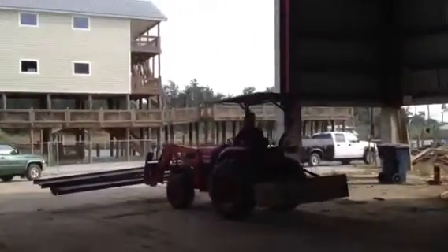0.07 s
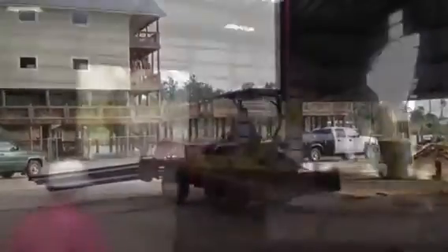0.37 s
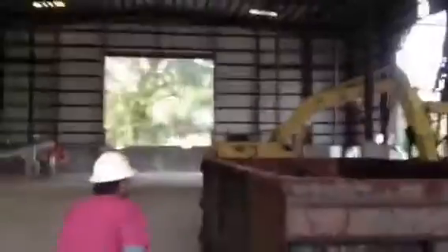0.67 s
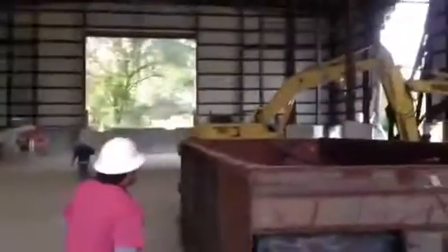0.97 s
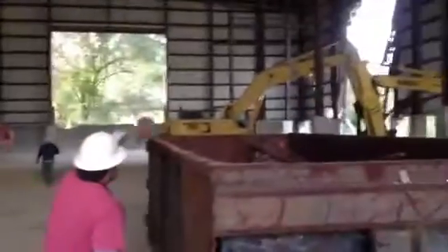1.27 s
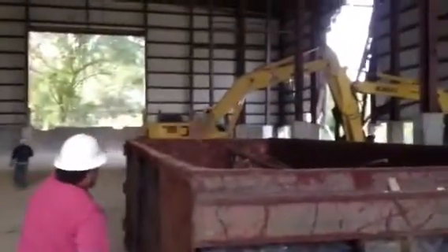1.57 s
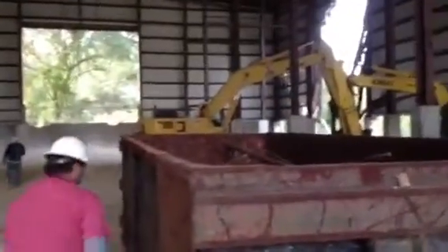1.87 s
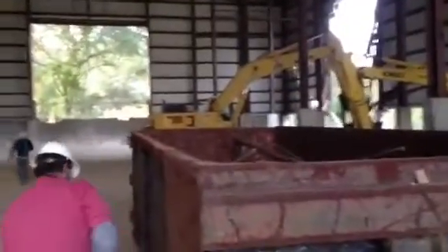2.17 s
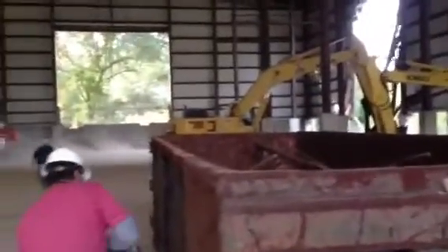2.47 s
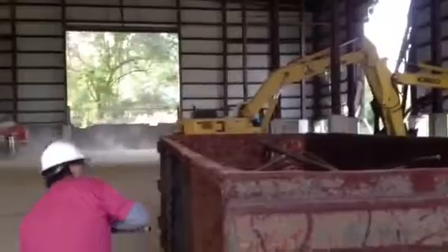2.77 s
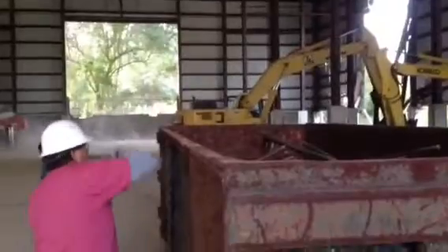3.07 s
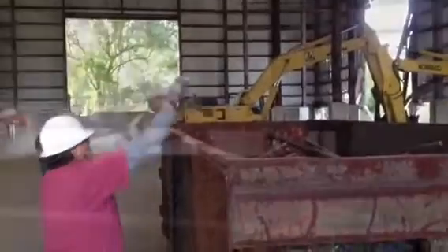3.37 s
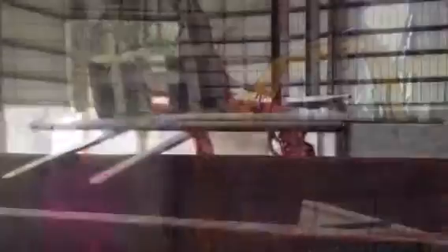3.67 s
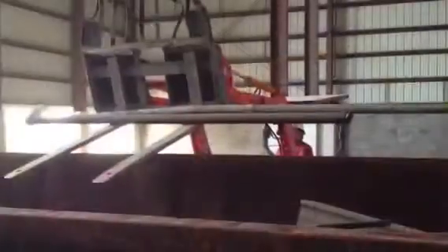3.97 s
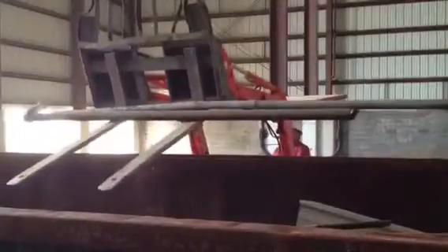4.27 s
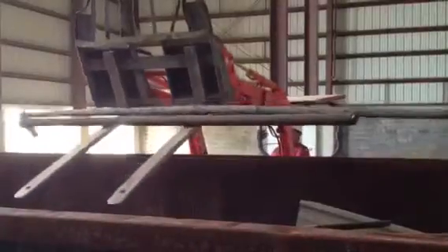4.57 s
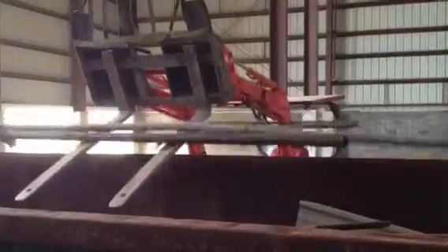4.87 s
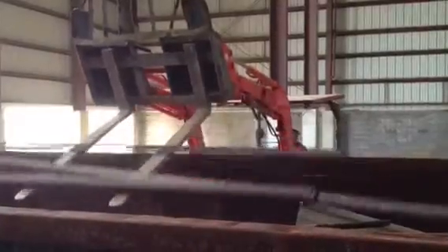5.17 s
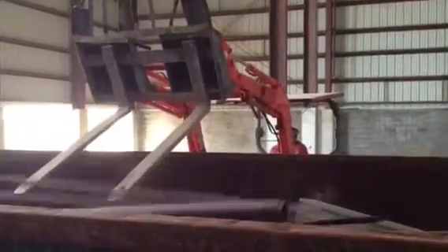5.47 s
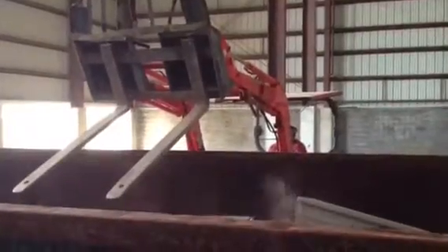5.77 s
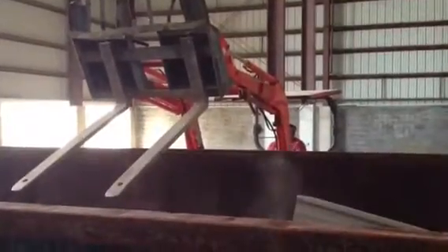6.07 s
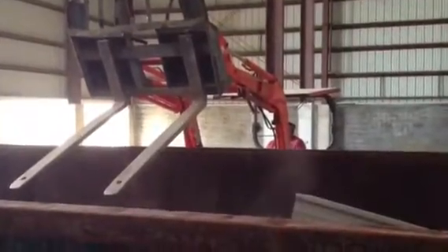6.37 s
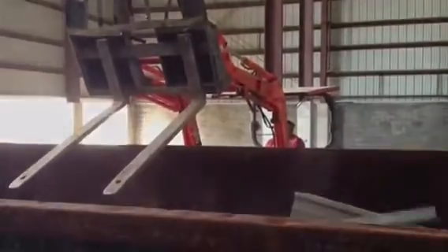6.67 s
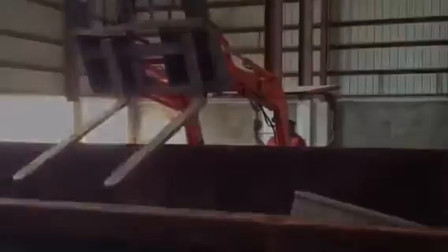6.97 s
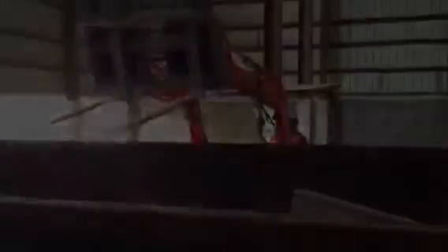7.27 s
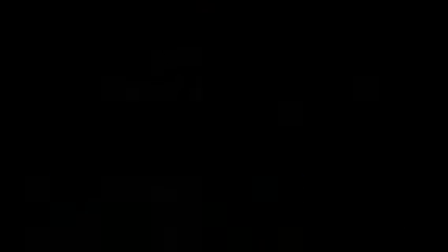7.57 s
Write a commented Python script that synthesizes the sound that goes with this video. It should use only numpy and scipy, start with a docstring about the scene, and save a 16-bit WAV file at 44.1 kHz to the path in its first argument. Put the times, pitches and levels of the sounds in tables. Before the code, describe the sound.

Diesel engines rumble as scrap metal booms, pipes slide and clang into a dumpster, and a sheet-metal panel topples in an echoing shed.

```python
"""Long metal pipes slide off a tractor's forks, hit a dumpster's rim, clatter to the bottom and ring.
The sound opens on the diesel tractor in a yard, then moves into a big steel shed, where a load of scrap
crashes and booms. The pipes follow, scraping by stick-slip, and a sheet-metal panel topples after them.
Each blow is a contact plus dying chatter that rings the steel and feeds the shed's reverberation.
Rubble, grit, engines and distant site noise lie underneath."""
import sys
import numpy as np
from scipy import signal
from scipy.fft import rfft, irfft
from scipy.io import wavfile
from scipy.ndimage import uniform_filter1d, minimum_filter1d, map_coordinates

SR = 44100
rng = np.random.default_rng(int(sys.argv[2]) if len(sys.argv) > 2 else 0)


def output_pcm(signal):
    """Save a mono or channel-first signal as 16-bit PCM at the path in sys.argv[1].

    Samples are clipped to [-1, 1] before scaling.
    """
    pcm = np.clip(np.atleast_2d(signal).T, -1, 1) * 32767
    wavfile.write(sys.argv[1], SR, np.round(pcm).astype(np.int16))


N = 344421
T = np.arange(N) / SR


def pipes():
    """Long pipes hit the rim, then bounce on the bottom: walls clang, pipes ring on, low modes longest."""
    # Blows on rim and bottom. Each row: start in seconds, level in dB, hardness in dB.
    rim_blows = [(4.864, -10.5, 9), (4.92, -17, -7.5), (4.995, -11, 0.5), (5.095, -11.5, -1),
                 (5.16, -13, 3)]
    bottom_blows = [(5.236, -8, 1), (5.324, -2.5, 0.5), (5.358, -9, 2.5), (5.425, -9, 0),
                    (5.478, -15, -10.5), (5.562, -11, -1), (5.612, -6, 1.5), (5.655, -7, 6.5),
                    (5.732, -8.5, 9), (5.8, -9, -3), (5.95, -11.5, -0.5), (6.066, -15.5, -3.5),
                    (6.13, -15.5, -2.5), (6.247, -27, -10.5)]
    # Spectra of those blows. Each row: frequency in Hz, gain in dB.
    rim_spectrum = [(53, -66), (90, -50.5), (194, -37.5), (262, 3), (420, -18.5), (510, 0.5), (749, -1.5),
                    (1280, 1), (1880, -3), (2760, -17), (3080, -12), (4330, -5), (6510, -30), (9570, -28.5),
                    (15000, -41.5)]
    bottom_spectrum = [(40, -45.5), (110, -32.5), (185, -10), (370, -10.5), (429, -12), (521, -6.5),
                       (567, -9.5), (1200, -6.5), (1490, -0.5), (1900, -5.5), (2760, -13), (4060, -11),
                       (4820, -11), (5300, -18), (6510, -24), (10600, -31), (15000, -42)]
    # Pipe modes. Each row: frequency in Hz, energy in dB.
    pipe_modes = [(1281, -35), (1381, -36), (1443, -32), (1490, -34), (1593, -37), (1715, -38), (1906, -39),
                  (2137, -32), (2385, -37), (2638, -37), (2902, -41), (3150, -32), (3410, -34), (3477, -30),
                  (3704, -30), (3771, -34), (3968, -26.5), (4080, -30), (4188, -32), (4385, -29.5),
                  (4517, -34), (4732, -26.5)]
    rim = blows(rim_blows, chatter_s=0.071, drag=0.49, contacts_per_s=3000, snap=3,
                low_t60_s=0.35, high_t60_s=0.058, ring_db=-1)
    rolling = settling(start_s=6, knocks_per_s=15, first_db=-18.5, fade_db_per_s=1.5,
                       hardness_db=-10, count=10)
    bottom = blows([*bottom_blows, *rolling], chatter_s=0.047, drag=0.099, contacts_per_s=1900, snap=4.4,
                   low_t60_s=0.25, high_t60_s=0.023, ring_db=2.5)
    walls = undb(2.5) * through(rim, colour(rim_spectrum))
    walls += undb(1.5) * through(bottom, colour(bottom_spectrum))
    # Nearly equal lengths ring in beating clusters.
    clusters = [(hz / length, db, 1.5 * (hz / 2000) ** -.6)
                for hz, db in pipe_modes for length in (.998, 1, 1.002)]
    shimmer = ring(overtones(low_hz=5280, high_hz=14000, t60_s=0.39, top_db=-3, count=90), size=14000)
    shaking = bottom + undb(-12) * rim
    return walls + undb(-6.5) * through(shaking, ring(clusters)) + undb(-22.5) * through(shaking, shimmer)


def wall_clangs():
    """Square hits ring the dumpster's wall."""
    # Each row: start in seconds, level in dB, pitch ratio.
    hits = [(4.866, -20, 0.72), (5.0, -14.5, 0.98), (5.362, -26, 0.89), (5.44, -24, 0.79),
            (5.481, -23.5, 1.14), (5.953, -20, 1.16), (6.006, -26, 1.16), (6.1, -26, 1.02),
            (6.131, -24.5, 1.17), (6.735, -24, 0.92), (6.83, -22.5, 0.9), (6.915, -22.5, 0.96)]
    # Each row: frequency in Hz at ratio 1, energy in dB, t60 in seconds.
    wall_modes = [(508, -10, .25), (910, -3, .25), (1139, -13.5, .22), (1268, 1, .15), (1305, -1, .24),
                  (1887, -8, .2)]
    return clangs(hits, wall_modes)


def end_clangs():
    """Pipes struck on their ends ring brightly."""
    # Each row: start in seconds, level in dB, pitch ratio.
    hits = [(5.185, -24.5, 1.02), (5.326, -13.5, 1.1), (5.368, -20, 1.06), (5.445, -22.5, 1.13),
            (5.674, -17, 1), (5.712, -21.5, 1.12), (5.772, -25, 0.95), (5.803, -19.5, 1.05),
            (5.953, -21.5, 1.06)]
    # Each row: frequency in Hz at ratio 1, energy in dB, t60 in seconds.
    end_modes = [(3050, -3.5, .2), (3750, 3, .2), (3960, 1, .22), (4170, -4, .16), (4390, -8, .2),
                 (4550, -1.5, .2)]
    return clangs(hits, end_modes)


def tines():
    """The fork tines ring as the pipes drop off; the last pipe judders over a tip and makes it sing."""
    # Each row: start in seconds, level in dB.
    tine_strikes = [(4.867, -21.5)]
    # Each row: frequency in Hz, energy in dB, t60 in seconds.
    tine_modes = [(758, 4.5, .12), (1330, -13, .3), (1710, 1, .4), (3138, -4.5, 0.84), (3320, -3.5, .3),
                  (4260, -6.5, .8), (4650, -8.5, .13), (4900, 4.5, 0.13), (7140, -3.5, 0.054)]
    # Spells of singing. Each row: start in seconds, level in dB, hold in seconds.
    sings = [(4.7, -38.5, .13), (4.878, -20, .15)]
    sing_hz, judder_hz = 3138, 24
    phase = 2 * np.pi * np.cumsum(sing_hz * (1 + .004 * walk(120) + .018 * walk(900))) / SR
    judders = np.cumsum(judder_hz * (1 + .2 * walk(30))) / SR
    pulsing = undb(2.9 * np.cos(2 * np.pi * judders) + 3.8 * walk(260))
    pressure = sum(undb(db) * swell(s, attack_s=.012, hold_s=hold_s, release_s=.02)
                   for s, db, hold_s in sings)
    rasp = undb(-9.5) * resonate(contacts(900), [(3310, 240, 0)])
    ringing = signal.oaconvolve(strike(tine_strikes), ring(tine_modes))[:N]
    return low_cut(ringing, hz=300) + (np.sin(phase) + rasp) * pressure * pulsing


def slide():
    """Stick-slip on the forks: the pipes creep, slip in bright scrapes, then judder in short jerks."""
    # Sliding resonances. Each row: centre in Hz, width in Hz, gain in dB.
    scrape_bands = [(1430, 160, -1.5), (1820, 350, -1.5), (3540, 330, -8), (4500, 740, -4.5),
                    (4830, 280, -1), (7200, 2800, -26.5), (11000, 7000, -22)]
    judder_bands = [(290, 96, -7.5), (514, 150, -5), (880, 230, -2), (1080, 120, 0), (1350, 200, -2),
                    (1730, 450, -8.5)]
    # Each row: start in seconds, level in dB.
    slip_events = [(4.385, -24.5), (4.418, -27), (4.448, -29.5), (4.51, -40.5), (4.545, -34)]
    jerk_events = [(4.555, -26), (4.608, -20.5), (4.75, -23), (4.795, -30)]
    sag_start_s, sag_length_s, sag_per_s = 4.53, .11, 0.99
    scrape = resonate(contacts(3500), scrape_bands) * undb(1.2 * walk(68))
    # The pitch sinks as the pipes move down the tines.
    pitch_ratio = 1 - sag_per_s * np.clip(T - sag_start_s, 0, sag_length_s)
    scrape = map_coordinates(scrape, [np.cumsum(pitch_ratio)], mode="mirror")
    judder = resonate(contacts(1300), judder_bands) * undb(1.6 * walk(35))
    creep = undb(-29) * swell(start_s=4.223, attack_s=0.27, hold_s=0.094, release_s=.2)
    slips = sum(undb(db) * swell(s, attack_s=.008, hold_s=.0066, release_s=.013) for s, db in slip_events)
    jerks = sum(undb(db) * swell(s, attack_s=.02, hold_s=.02, release_s=.059) for s, db in jerk_events)
    return (creep + slips) * scrape + jerks * judder


def squeak():
    """A slipping pipe catches on a tine and squeaks with a rough, falling pitch."""
    start_s, length_s = 4.405, 0.087
    start_hz, sag_hz_per_s = 1960, 4300
    hz = start_hz - sag_hz_per_s * np.clip(T - start_s, 0, length_s)
    phase = 2 * np.pi * np.cumsum(hz * (1 + 0.065 * walk(900))) / SR
    envelope = swell(start_s, attack_s=.012, hold_s=length_s, release_s=.005) * undb(-28 + 5 * walk(300))
    return (np.sin(phase) + undb(-23) * np.sin(2 * phase)) * envelope


def scrap():
    """A heavy load of mixed scrap lands across the shed and settles."""
    # Each row: start in seconds, level in dB, hardness in dB.
    landing = [(1.893, -17, 6), (1.906, -8.5, -1), (1.924, -8.5, 8), (1.98, -7.5, 1.5), (2.012, -14, 0),
               (2.09, -15, -5), (2.22, -14.5, -7), (2.31, -18.5, -5), (2.39, -24, -13.5)]
    # Each row: frequency in Hz, gain in dB.
    spectrum = [(41, -67), (70, -33), (120, -16), (180, -4.5), (270, -4), (370, -4.5), (494, -2.5),
                (791, -1.5), (1080, -3.5), (1450, -2), (2850, -7), (3260, -10.5), (4170, -7.5), (4950, -13),
                (5450, -19.5), (9150, -28), (15000, -46)]
    rocking = settling(start_s=2.28, knocks_per_s=16, first_db=-28.5, fade_db_per_s=20.5,
                       hardness_db=-8, count=4)
    crash = blows([*landing, *rocking], chatter_s=0.052, drag=0.62, contacts_per_s=4000, snap=1.8,
                  low_t60_s=0.15, high_t60_s=0.08, ring_db=-9)
    return through(crash, colour(spectrum))


def floor_boom():
    """The heaviest scrap rings the steel floor."""
    # Each row: start in seconds, level in dB.
    floor_strikes = [(1.893, -27), (1.909, -22), (1.925, -22), (1.961, -24), (2.228, -26.5), (2.275, -31.5),
                     (2.325, -24.5), (2.402, -24.5), (2.49, -30)]
    # Each row: frequency in Hz, energy in dB, t60 in seconds.
    floor_modes = [(148.5, -7, 0.29), (195, 1.5, 0.16), (251, -0.5, 0.14), (324.5, -2, 0.14),
                   (374.4, -3.5, .16), (481, 0.5, 0.12)]
    ringing = signal.oaconvolve(strike(floor_strikes), ring(floor_modes, size=14000))[:N]
    return low_cut(ringing, hz=125)


def panel():
    """A sheet-metal panel topples, booms against the dumpster and rocks to rest."""
    # Each row: start in seconds, level in dB, hardness in dB.
    landing = [(6.733, -8.5, 0), (6.762, -12.5, -3), (6.827, -12, -5), (6.903, -13.5, -5)]
    # Each row: frequency in Hz, gain in dB.
    spectrum = [(41, -71), (70, -34), (125, -8), (180, 2), (269, -2), (420, -1.5), (780, -1), (960, 1.5),
                (1330, -2), (1850, -1.5), (2150, -6), (2650, -13), (3990, -10), (6530, -26.5), (9790, -32),
                (15000, -40)]
    rocking = settling(start_s=6.93, knocks_per_s=16, first_db=-19.5, fade_db_per_s=22,
                       hardness_db=-11.5, count=7)
    crash = blows([*landing, *rocking], chatter_s=0.037, drag=0.116, contacts_per_s=1800, snap=2.4,
                  low_t60_s=0.57, high_t60_s=0.077, ring_db=-4.5)
    return through(crash, colour(spectrum))


def panel_edge():
    """The panel's edge catches the near wall with a short, bright clank."""
    # Each row: start in seconds, level in dB, hardness in dB.
    edge_blows = [(6.824, -10.5, 0.92)]
    # Each row: frequency in Hz, gain in dB.
    spectrum = [(200, -32), (1000, 5), (2600, -14), (3300, 1.5), (4000, 1.5), (4800, -2), (5600, -21),
                (8500, -25), (9300, -11.5), (10300, -12.5), (12000, -25), (15000, -35)]
    clank = blows(edge_blows, chatter_s=0.035, drag=0, contacts_per_s=2500, snap=3,
                  low_t60_s=0.16, high_t60_s=0.074, ring_db=6)
    return through(clank, colour(spectrum))


def rubble():
    """Loose rubble clinks and scuffs."""
    # Each row: start in seconds, level in dB, hardness in dB.
    knocks = [(.794, -31.5, 11), (.83, -31, 8.7), (.86, -34, 1), (1.463, -41, 17.5), (1.52, -38, 7),
              (3.803, -27.5, 1), (3.832, -32.5, 1)]
    # Each row: frequency in Hz, gain in dB.
    spectrum = [(50, -37), (130, -14), (300, 9), (470, 6.5), (700, 4), (1050, 3.5), (1500, -0.5),
                (4000, -9.5), (7000, -23), (15000, -28)]
    clinks = blows(knocks, chatter_s=0.038, drag=0, contacts_per_s=2100, snap=3.3,
                   low_t60_s=0.081, high_t60_s=.04, ring_db=9)
    return through(clinks, colour(spectrum))


def grit_and_hiss():
    """Short spills of grit, and the high hiss of the pipes scraping along the forks."""
    # Each row: start in seconds, level in dB, length in seconds.
    bursts = [(1.49, -42.5, 0.084), (2.99, -48.5, 0.23), (3.726, -38.5, 0.027), (4.25, -41, 0.24),
              (4.435, -33.5, 0.1), (4.495, -36, 0.18), (4.695, -31.5, 0.028), (4.723, -39.5, 0.28),
              (5.564, -29, 0.089), (6.349, -27.5, 0.058), (6.424, -35, 0.076), (6.537, -27.5, 0.06),
              (6.94, -36.5, 0.16), (7.216, -40.5, 0.05)]
    # Each row: frequency in Hz, gain in dB.
    spectrum = [(1500, -22), (4000, -2), (7500, -5.5), (11000, -4.5), (15000, -13.5)]
    envelope = 0
    for start_s, db, length_s in bursts:
        progress = np.maximum(T - start_s, 0) / length_s
        envelope += undb(db) * np.minimum(progress * 4, 1) * np.exp(-progress ** 2)
    return envelope * through(contacts(3000), colour(spectrum))


def board():
    """Something hollow, like a loose board, knocks a few times."""
    # Each row: start in seconds, level in dB.
    knocks = [(1.334, -45), (1.366, -47), (1.399, -47), (1.478, -44), (1.542, -47)]
    # Each row: frequency in Hz, energy in dB, t60 in seconds.
    board_modes = [(294, -4, .09), (380, -6, .08), (502, -6, .08), (605, -5.5, 0.05), (880, -7.5, .06),
                   (1040, -9, .05), (1720, -14.5, .03)]
    return signal.oaconvolve(strike(knocks), ring(board_modes, size=7000))[:N]


def tick():
    """A double contact close by: one dry tick with a low thump."""
    # Each row: start in seconds, level in dB.
    touches = [(3.856, -3), (3.8572, -1.5)]
    # Each row: frequency in Hz, gain in dB.
    spectrum = [(30, 0), (150, -7), (500, -3), (1100, 3), (1800, -4), (2800, 2), (4000, -12), (5600, -4),
                (6800, -19), (15000, -20)]
    return through(strike(touches), colour(spectrum))


def shed_tractor():
    """The tractor's diesel and loose parts, swelling as it tips the pipes."""
    # Each row: frequency in Hz, gain in dB.
    spectrum = [(29, -37), (50, -40.5), (128, -1.5), (186, -6), (272, -4), (307, -9.5), (362, -0.5),
                (449, -6), (544, -1), (2100, -8.5), (2480, -19.5), (4770, -21), (5910, -26.5),
                (9760, -29.5), (15000, -39.5)]
    # Each row: centre in Hz, width in Hz, gain in dB.
    loose_parts = [(4450, 500, -1.5), (4830, 330, -1.5)]
    # Each row: time in seconds, level in dB.
    levels = [(3.3, -48), (3.46, -31), (4.2, -32), (6.5, -27.5), (7.6, -33)]
    rattling = rattle(loose_parts, shakes_per_s=70, uneven_db=3) * undb(-16.5)
    engine = diesel(spectrum, firing_hz=44.6, knock_db=-12, thump_db=-9.5)
    return (engine + rattling) * undb(curve(levels))


def yard_tractor():
    """The tractor's diesel runs steadily outdoors; loose parts rattle."""
    # Each row: frequency in Hz, gain in dB.
    spectrum = [(29, -65), (50, -37), (121, -8.5), (209, -2), (329, -10.5), (428, -3), (471, -9),
                (570, -5.5), (1350, -8), (1670, -5.5), (2120, -9), (2690, -23), (4660, -20.5), (5380, -27),
                (15000, -38.5)]
    # Each row: centre in Hz, width in Hz, gain in dB.
    loose_parts = [(4180, 550, -2.5), (4660, 390, -0.5), (1690, 300, 2.5)]
    engine = diesel(spectrum, firing_hz=37.8, knock_db=-25, thump_db=-14) * undb(-28.5)
    return engine + rattle(loose_parts, shakes_per_s=90, uneven_db=6.5) * undb(-41)


def excavator():
    """An excavator's diesel grows louder as it takes load, then fades."""
    # Each row: time in seconds, level in dB.
    levels = [(1.35, -55.5), (1.7, -44), (2.5, -33), (3.3, -37), (3.7, -82)]
    # Each row: frequency in Hz, gain in dB.
    spectrum = [(60, -24.5), (160, -8.5), (450, 7), (900, 2.5), (1500, -11), (4000, -9), (9000, -38.5)]
    return diesel(spectrum, firing_hz=60.3, knock_db=-6, thump_db=-16) * undb(curve(levels))


def site_noise():
    """Distant site rumble in the shed, slowly fading."""
    # Each row: frequency in Hz, gain in dB.
    spectrum = [(50, -53), (80, -27.5), (110, -5.5), (180, 1), (260, -3.5), (450, -8), (700, -24.5),
                (1500, -24.5), (2760, -14.5), (6350, -27), (7500, -23.5), (15000, -37)]
    # Each row: time in seconds, level in dB.
    levels = [(.76, -45.5), (3.3, -48.5), (7.6, -54.5)]
    rumble = unit(through(rng.standard_normal(N), colour(spectrum)))
    return rumble * undb(curve(levels) + 0.73 * walk(4.7))


def shed_reverb(x):
    """Dense reflections build up fast and linger; the treble dies first."""
    # Each row: frequency in Hz, t60 in seconds.
    decay = [(100, 2.6), (250, 3.1), (700, 3.02), (1500, 3.04), (2800, 2.48), (4500, 1.19), (8000, 1.3),
             (15000, 0.25)]
    size, build_s = 2 ** 17, 0.0027
    return through(x, dense_ring(decay, size, bands=12) * (1 - np.exp(-T[:size] / build_s)))


def blows(rows, chatter_s, drag, contacts_per_s, snap, low_t60_s, high_t60_s, ring_db, size=16384):
    """One contact plus dying chatter per blow. Hard edges crack; soft faces thud and, with drag, linger."""
    # Hardness trades thud for clang. Each row: frequency in Hz, gain in dB per dB of hardness.
    hardness_tilt = [(200, -0.64), (500, -0.58), (1300, 0), (2000, 0.5157), (3800, 0.29), (8000, 1.08)]
    out = np.zeros(2 * N)
    for start_s, db, hardness_db in rows:
        decay_s = chatter_s * undb(-drag * hardness_db)
        rise_s = 0.0012 * undb(-2.3 * hardness_db)
        envelope = np.exp(-T[:size] / decay_s) * (1 - np.exp(-T[:size] / rise_s))
        force = contacts(contacts_per_s, size) * envelope
        force[0] += snap * undb(0.57 * hardness_db)
        force *= np.sqrt(decay_s * SR / 2) / np.linalg.norm(force)  # energy grows with decay time
        tilt = colour([(hz, share * hardness_db) for hz, share in hardness_tilt], size=512)
        sound = signal.fftconvolve(np.convolve(force, tilt), steel(low_t60_s, high_t60_s, ring_db))
        start = int(start_s * SR)
        out[start:start + len(sound)] += undb(db) * sound
    return out[:N]


def settling(start_s, knocks_per_s, first_db, fade_db_per_s, hardness_db, count):
    """Rows of blows for pieces that rock and drop at random, ever more weakly."""
    when, weight, edge = rng.random((count, 3)).T
    age_s = (np.arange(count) + when) / knocks_per_s
    level_db = first_db - fade_db_per_s * age_s + weight - .5
    return np.transpose([start_s + age_s, level_db, hardness_db + edge - .5])


def steel(low_t60_s, high_t60_s, ring_db, size=16384):
    """Click and dense ring of thin steel; every struck spot differs."""
    body = dense_ring([(200, low_t60_s), (10000, high_t60_s)], size, bands=4)
    body *= undb(ring_db) / np.linalg.norm(body)
    body[0] += 1
    return body / np.linalg.norm(body)


def clangs(hits, modes):
    """Clear rings whose pitch depends on the piece and the spot struck."""
    out = np.zeros(2 * N)
    for start_s, db, ratio in hits:
        sound = ring([(hz * ratio, mode_db, t60_s) for hz, mode_db, t60_s in modes], size=22000)
        start = int(start_s * SR)
        out[start:start + len(sound)] += undb(db) * sound
    return low_cut(out[:N], hz=300)


def overtones(low_hz, high_hz, t60_s, top_db, count):
    """Crowded upper modes of a pipe bundle, weaker towards the top."""
    places = (np.arange(count) + rng.random(count)) / count
    return [(low_hz + (high_hz - low_hz) * place, top_db * place, t60_s) for place in places]


def diesel(spectrum, firing_hz, knock_db, thump_db):
    """Uneven firings thump the exhaust; each sets off a burst of clatter over the fan's rush."""
    cycles = np.cumsum(firing_hz * (1 + 0.014 * walk(8.6))) / SR
    firings = unit(np.diff(np.floor(cycles), prepend=0) * undb(3.1 * walk(44)))
    thump = signal.sosfilt(signal.butter(2, 350, fs=SR, output="sos"), firings)
    knock = undb(knock_db) * np.exp(-(cycles % 1) / .25)
    clatter = unit(rng.standard_normal(N) * (1 + knock))
    return unit(through(clatter + undb(thump_db) * thump, colour(spectrum))) * undb(.5 * walk(5.7))


def rattle(parts, shakes_per_s, uneven_db):
    """Loose steel chatters without pause, each part shaking in its own way."""
    return unit(sum(undb(db + uneven_db * walk(shakes_per_s)) * resonate(contacts(1500), [(hz, width, 0)])
                    for hz, width, db in parts))


def ring(modes, size=55000):
    """Decaying sines from rows of frequency in Hz, energy in dB, t60 in seconds."""
    t = T[:size]
    return sum(undb(db) * mode_decay(t, t60_s) * np.sin(2 * np.pi * (hz * t + rng.random()))
               for hz, db, t60_s in modes)


def dense_ring(t60_points, size, bands):
    """Countless overlapping modes: noise bands, each dying at its own rate."""
    centres_hz = np.geomspace(100, 15000, bands)
    bins_hz = np.fft.rfftfreq(size, 1 / SR)
    noise = rfft(rng.standard_normal(size))
    out = 0
    for hz, share in zip(centres_hz, np.eye(bands)):
        band = irfft(noise * np.interp(bins_hz, centres_hz, share))
        out += band * mode_decay(T[:size], at_pitch(hz, t60_points))
    return out


def mode_decay(t, t60_s):
    """Exponential decay with the same energy at any t60."""
    return np.exp(-np.log(1000) * t / t60_s) / np.sqrt(t60_s)


def resonate(x, bands):
    """Steep parallel resonances, at rms 1."""
    filters = [(signal.iirpeak(hz, hz / width_hz, fs=SR), db) for hz, width_hz, db in bands]
    return unit(sum(undb(db) * signal.lfilter(*ba, signal.lfilter(*ba, x)) for ba, db in filters))


def contacts(per_s, size=N):
    """Tiny collisions at random moments, rms 1."""
    return unit((rng.random(size) < per_s / SR) * rng.standard_normal(size))


def strike(rows):
    """One clean impulse per row."""
    force = np.zeros(N)
    for start_s, db in rows:
        force[int(start_s * SR)] += undb(db)
    return force


def swell(start_s, attack_s, hold_s, release_s):
    """Envelope: linear rise, hold, exponential release."""
    age_s = T - start_s
    return np.clip(age_s / attack_s, 0, 1) * np.exp(-np.maximum(age_s - attack_s - hold_s, 0) / release_s)


def walk(knots_per_s):
    """Random drift with a spread near 1."""
    knots = rng.standard_normal(16384)
    return np.interp(T * knots_per_s, np.arange(len(knots)), knots)


def colour(spectrum, size=4096):
    """Minimum-phase impulse response of a spectrum."""
    gain = undb(at_pitch(np.fft.rfftfreq(size, 1 / SR), spectrum))
    cepstrum = irfft(np.log(gain))
    cepstrum[1:size // 2] *= 2
    cepstrum[size // 2 + 1:] = 0
    return irfft(np.exp(rfft(cepstrum)))


def through(x, response):
    """Convolve with a response scaled to unit energy."""
    return signal.oaconvolve(x, response / np.linalg.norm(response))[:N]


def low_cut(x, hz):
    """High-pass that removes the low thump at the abrupt start of each ring."""
    return signal.sosfilt(signal.butter(4, hz, "highpass", fs=SR, output="sos"), x)


def at_pitch(hz, points):
    """Interpolate on a log-frequency axis."""
    points_hz, values = np.transpose(points)
    return np.interp(np.log(hz + 1), np.log(points_hz), values)


def curve(rows):
    """A timed table at every sample."""
    return np.interp(T, *np.transpose(rows))


def unit(x):
    """Scale to rms 1."""
    return x / np.sqrt(np.mean(x ** 2))


def undb(db):
    """Decibels to gain."""
    return 10 ** (np.asarray(db) / 20)


def scene():
    """The yard first, then the shed, where every crash feeds the reverberation."""
    indoors_s, crossfade_s = .752, .01
    # Each row: sound, direct gain in dB, reverberant gain in dB.
    sources = [(scrap(), -1.5, 1.5), (floor_boom(), 0, -8),
               (pipes(), -1, -4), (tines(), 0, -12), (slide(), -.5, -6),
               (wall_clangs(), 0, -8), (end_clangs(), 0, -8), (squeak(), 0, -8),
               (panel(), -1, 1.5), (panel_edge(), 0, -7),
               (rubble(), 0, -7), (board(), 0, -7), (grit_and_hiss(), 0, -7)]
    direct = sum(x * undb(direct_db) for x, direct_db, _ in sources)
    reverb = shed_reverb(sum(x * undb(wet_db) for x, _, wet_db in sources))
    tractor = shed_tractor()
    yard = yard_tractor()
    shed = direct + reverb + tick() + tractor + site_noise() + excavator()
    indoors = np.clip((T - indoors_s) / crossfade_s, 0, 1)
    return ((1 - indoors) * yard + indoors * shed)[None]


def record(dry):
    """A limiter ducks the crashes and remaining peaks clip; a quick final fade and a low-pass follow."""
    ceiling, hold_s = 1.15, .004
    end_s, fade_s, top_hz = 7.627, .004, 15400
    window = int(hold_s * SR) + 1
    needed_gain = ceiling / np.maximum(np.abs(dry), ceiling)
    gain = uniform_filter1d(minimum_filter1d(needed_gain, window), window)
    clipped = np.clip(dry * gain, -1, 1)
    fade = np.exp(-np.maximum(T - end_s, 0) / fade_s)
    return signal.sosfilt(signal.ellip(8, .2, 70, top_hz, fs=SR, output="sos"), clipped * fade)


dry = scene()
out = record(dry)
output_pcm(out)
```